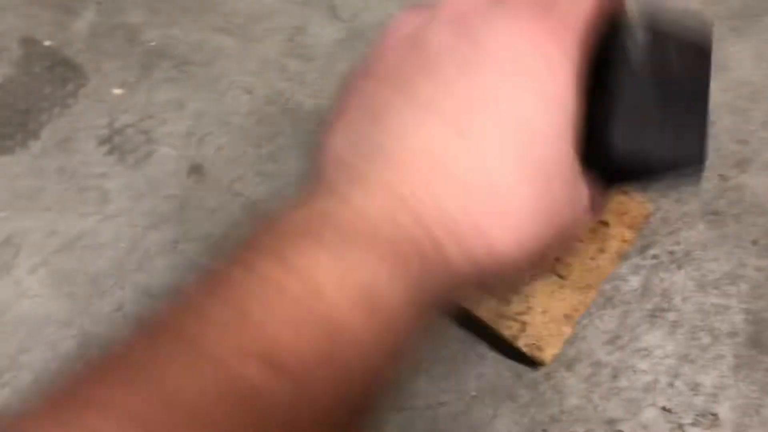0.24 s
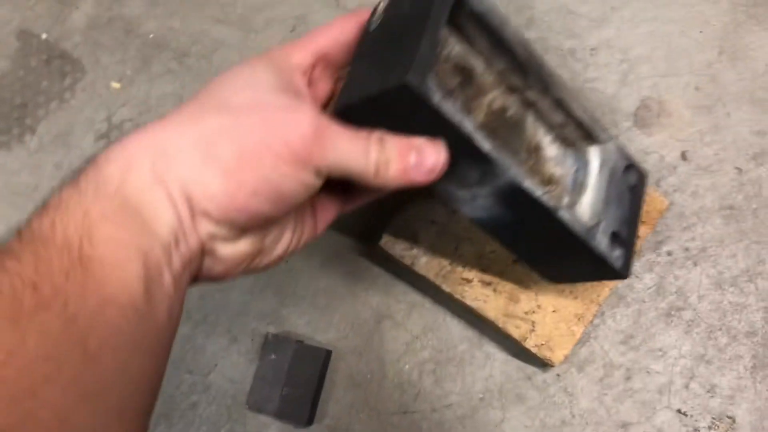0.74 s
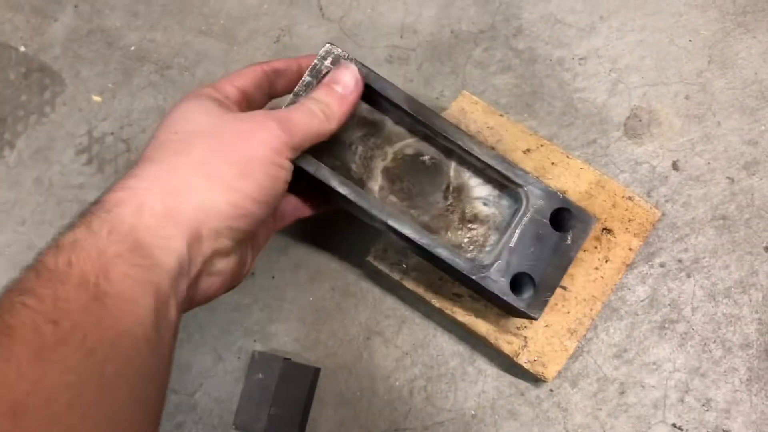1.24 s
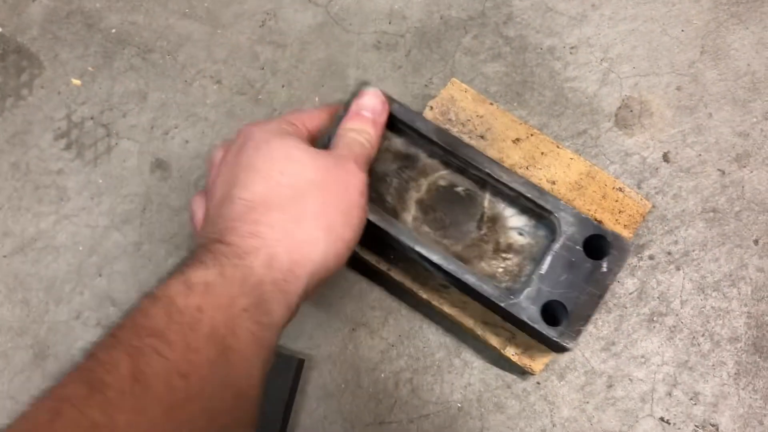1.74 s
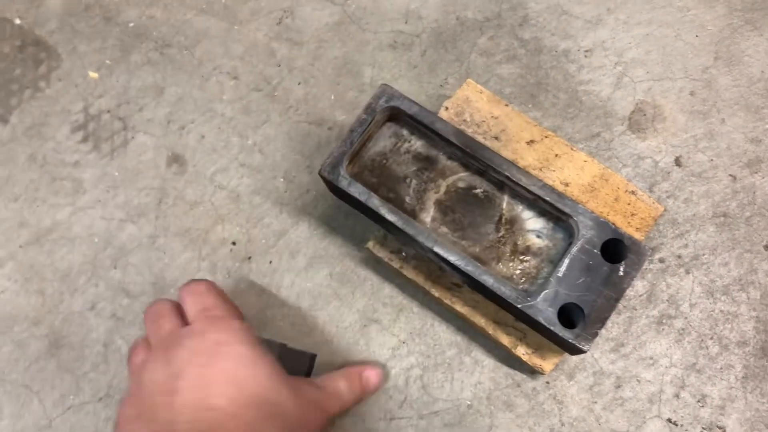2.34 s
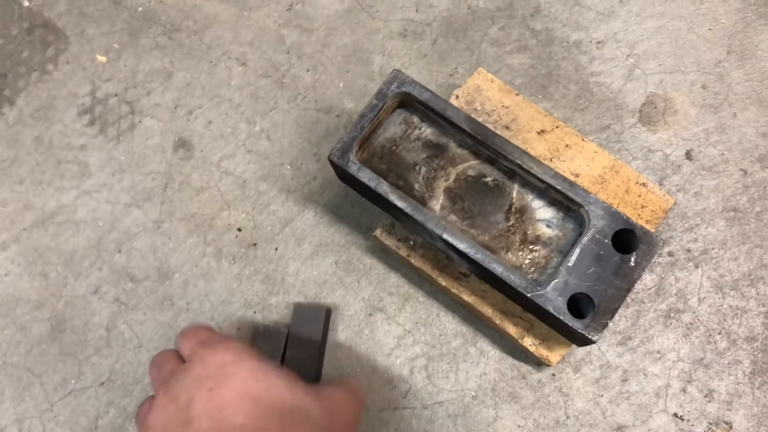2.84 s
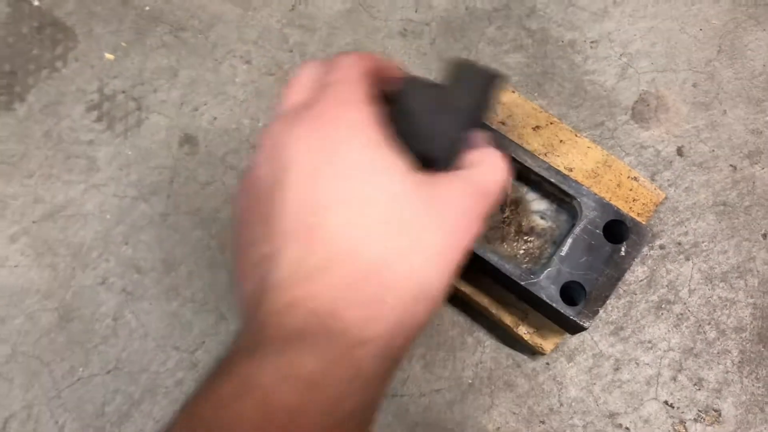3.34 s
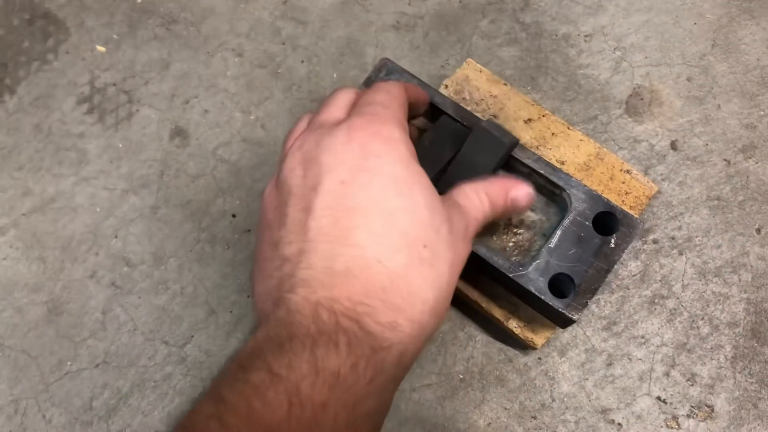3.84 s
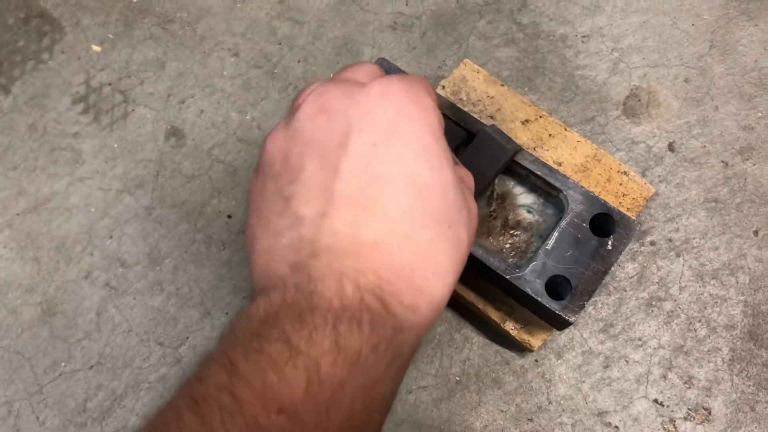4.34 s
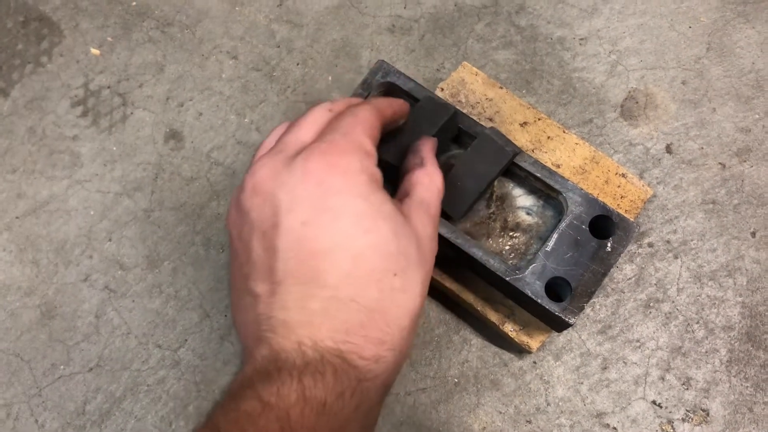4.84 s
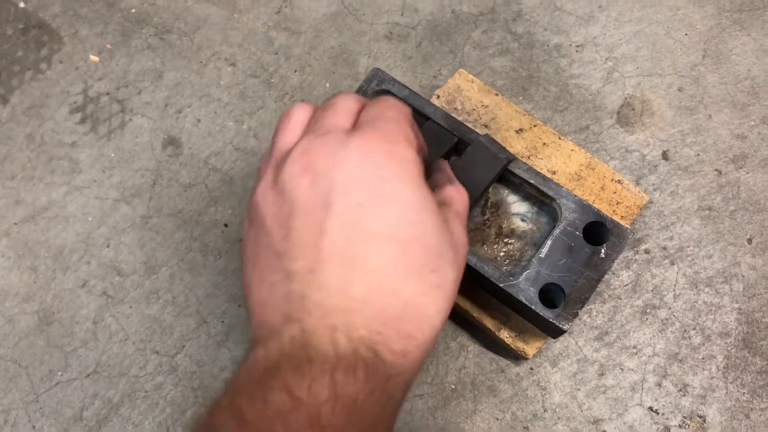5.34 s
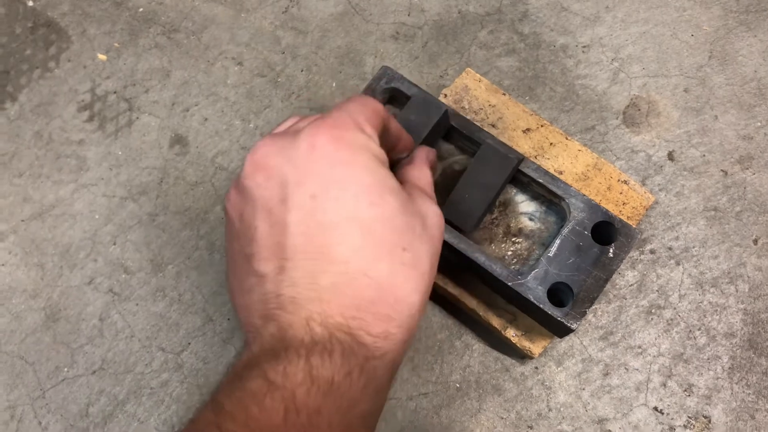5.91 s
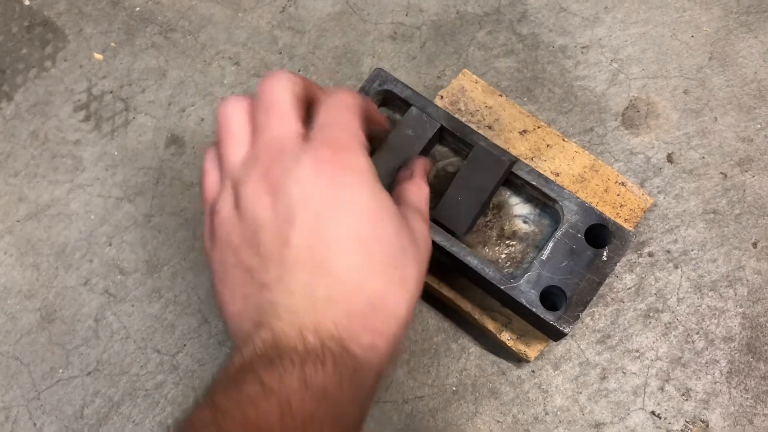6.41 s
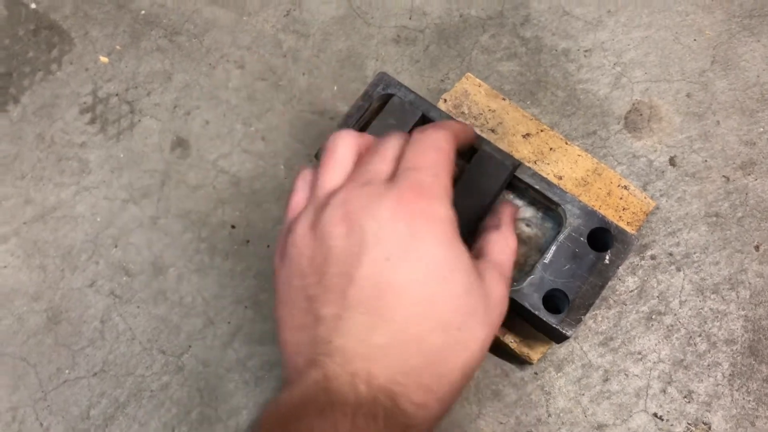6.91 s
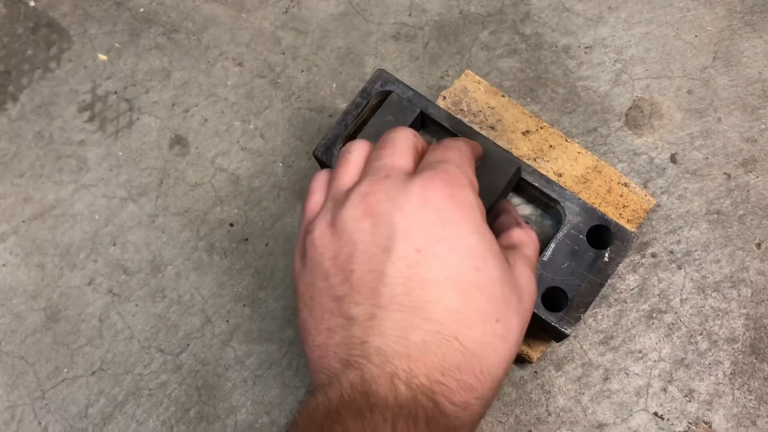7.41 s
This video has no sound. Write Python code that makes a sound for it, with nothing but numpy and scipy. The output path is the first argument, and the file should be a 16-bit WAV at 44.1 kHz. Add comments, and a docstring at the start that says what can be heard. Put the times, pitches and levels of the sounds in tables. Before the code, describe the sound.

A low furnace burner roars steadily with a faint hiss while a graphite mould knocks on a plank and small blocks clink into it.

```python
"""A low, steady roar with a faint hiss, and over it knocks, scrapes and ringing clinks.
A small furnace burner in a workshop makes the roar and its gas jet the hiss: resonance-shaped noise.
Close by, a hand turns a graphite ingot mould over, sets it on a plank, picks two small blocks off
the concrete floor and stands them in the mould, where they clink. Blows are band-limited pushes
with a dying chatter, rings are dying sines, and slips are a wavering tone with a noise scuff."""
import sys
import numpy as np
from scipy import signal
from scipy.fft import rfft, irfft
from scipy.io import wavfile
from scipy.ndimage import uniform_filter1d

SR = 44100
rng = np.random.default_rng(int(sys.argv[2]) if len(sys.argv) > 2 else 0)


def pcm_store(signal):
    """Save signal as 16-bit PCM."""
    levels = np.round(np.clip(np.atleast_2d(signal), -1, 1) * 32767)
    wavfile.write(sys.argv[1], SR, levels.astype(np.int16).T)


N = 338247


def gain_of(db):
    """Decibels to amplitude."""
    return 10 ** (np.asarray(db) / 20)


def read(points, hz):
    """A table's value at hz, joined on a log-frequency axis."""
    f, value = np.transpose(points)
    return np.interp(np.log(hz + 1), np.log(f), value)


def add(mix, start_s, sound):
    """Mixes a sound in at start_s, cut at the end of the mix."""
    part = mix[round(start_s * SR):][:len(sound)]
    part += sound[:len(part)]


def turbulence(slope, peaks):
    """Gas noise of a broad spectrum, lifted or cut at each resonance."""
    hz = np.fft.rfftfreq(N, 1 / SR)
    db = read(slope, hz)
    for peak_hz, width_hz, lift_db in peaks:
        db = db + lift_db * np.exp(-(2 * (hz - peak_hz) / width_hz) ** 2)
    spectrum = rfft(rng.standard_normal(N)) * gain_of(db)
    return irfft(spectrum, N) * np.sqrt(SR / 2)  # dB per Hz to amplitude


def ring(modes, length=1, tilt_db_per_octave=0):
    """Modes as dying sines: length scales every decay, tilt favours those above the first."""
    t = np.arange(SR // 2) / SR
    out = np.zeros(len(t))
    for k, (hz, db, t60_s) in enumerate(modes):
        level_db = db + tilt_db_per_octave * np.log2(hz / modes[0][0])
        decay_db = -60 * t / (t60_s * length)
        out += (-1) ** k * gain_of(level_db + decay_db) * np.sin(2 * np.pi * hz * t)
    return out


def contact(low_hz, top_hz, chatter, t60_s):
    """One sharp push and a dying chatter of the rough faces, with a peak near 1."""
    t = np.arange(SR // 8) / SR
    top_hz = np.clip(top_hz, low_hz + 100, SR / 2 - 100)
    band = signal.butter(3, [low_hz, top_hz], "band", fs=SR, output="sos")
    push = signal.sosfilt(band, signal.unit_impulse(len(t)))
    rattle = signal.sosfilt(band, rng.standard_normal(len(t)) * gain_of(-60 * t / t60_s))
    return (push + chatter * rattle) / abs(push).max()


def burner(roar_rms_db=-15.5, hiss_db=0):
    """Flame turbulence roars through furnace and room; jet turbulence hisses through the burner tube."""
    # flame spectrum before resonances: (frequency [Hz], relative density [dB/Hz])
    roar_slope = [(20, -85), (32, -85), (42, -67.5), (62, -62.5), (100, -49.5), (150, -49), (200, -43.5),
                  (270, -48), (340, -48.5), (390, -65.5), (470, -67.5), (600, -70.5), (800, -84.5),
                  (1300, -110)]
    # furnace and room resonances: (frequency [Hz], width [Hz], lift [dB])
    roar_peaks = [(64.5, 16, 5.5), (88.3, 5.9, -13), (121.5, 8.7, 7), (149.85, 18.8, 14.5),
                  (177.5, 35.1, 8), (196.1, 9.8, 10.5), (226.5, 23, 10.5), (241.1, 11.2, 9.5),
                  (271.1, 39, 12), (308.3, 28.6, 7), (350.3, 23, 8), (379.3, 11.6, 10), (405.3, 5, 10),
                  (419.9, 36.5, 15.5), (470.5, 26, 12), (505, 31, 5.5), (539, 17.5, 8.5), (688, 55, 8)]
    # jet spectrum before resonances: (frequency [Hz], density [dB/Hz])
    hiss_slope = [(400, -110), (800, -78), (1300, -86.5), (2200, -93), (3200, -93), (3900, -100.4),
                  (5300, -99.4), (8000, -99.8), (10500, -94.5), (13000, -96), (14300, -99), (15700, -92)]
    # burner tube resonances: (frequency [Hz], width [Hz], lift [dB])
    hiss_peaks = [(877, 23, -21), (1160, 110, 6), (1749, 106, 12), (2453, 142, 12.5), (2940, 110, 6.5),
                  (3510, 143, 17), (4166, 190, 12.5), (4370, 103, 6.5), (4757, 275, 10), (4940, 54, 13),
                  (5065, 280, 10), (5633, 86, 15), (5875, 160, 12.5), (6230, 380, 12.5), (7140, 240, 8),
                  (7620, 360, 8), (8150, 212, 7.2), (9030, 340, 6.5), (9712, 184, 2.5), (11740, 162, 5),
                  (12330, 320, 10), (13700, 631, 6), (15320, 140, 2.9)]
    roar = turbulence(roar_slope, roar_peaks)
    hiss = turbulence(hiss_slope, hiss_peaks)
    return gain_of(roar_rms_db) * roar / roar.std() + gain_of(hiss_db) * hiss


def workshop(x, wet_db=-19, echo_db=-15, echo_s=0.0045):
    """A quick bounce off the floor, then a diffuse tail whose decay time depends on frequency."""
    # reverberation: (frequency [Hz], t60 [s])
    room_t60 = [(500, 0.33), (2500, 0.54), (6000, 0.28), (14000, 0.023)]
    hz, t, z = signal.stft(rng.standard_normal(SR // 2), SR, nperseg=256)
    decay_db = -60 * t / read(room_t60, hz)[:, None]
    tail = signal.istft(z * gain_of(decay_db), SR, nperseg=256)[1]
    tail = tail / np.linalg.norm(tail)
    out = x.copy()
    add(out, echo_s, gain_of(echo_db) * x)
    add(out, 2 * echo_s, gain_of(wet_db) * signal.fftconvolve(x, tail))
    return out


def grit():
    """Grains under hand and blocks crack with a dry, bright tick, or scrape on briefly."""
    # ticks and scuffs: (time [s], level [dB], top [Hz], chatter t60 [s])
    ticks = [(1.334, -37, 15100, 0.12), (1.378, -37, 13960, 0.12), (2.663, -29.5, 6460, 0.013),
             (2.936, -48, 8000, .03), (2.9684, -16, 11400, 0.012)]
    out = np.zeros(N)
    for start_s, db, top_hz, t60_s in ticks:
        add(out, start_s, gain_of(db) * contact(low_hz=2520, top_hz=top_hz, chatter=0.24, t60_s=t60_s))
    return out


def drag(bend_hz=2335, waver_rms_hz=25, scuff_db=-9, attack_s=.005, t60_s=.09):
    """Friction as the mould is lifted keeps its bending mode singing, with wavering pitch and dry scuff."""
    # slips: (time [s], rms level of the song [dB], hold from onset [s])
    slips = [(0.089, -44, 0.029), (0.132, -44, 0.033)]
    t = np.arange(SR // 4) / SR
    scuff_band = signal.butter(2, [1200, 4000], "band", fs=SR, output="sos")
    out = np.zeros(N)
    for start_s, db, hold_s in slips:
        waver = uniform_filter1d(rng.standard_normal(len(t)), size=200)
        pitch_hz = bend_hz + waver_rms_hz * waver / waver.std()
        song = np.sqrt(2) * np.sin(2 * np.pi * np.cumsum(pitch_hz) / SR)
        scuff = signal.sosfilt(scuff_band, rng.standard_normal(len(t)))
        attack = np.minimum(t / attack_s, 1)
        decay_db = -60 * np.maximum(t - hold_s, 0) / t60_s
        envelope = attack * gain_of(db + decay_db)
        add(out, start_s, envelope * (song + gain_of(scuff_db) * scuff / scuff.std()))
    return out


def knocks():
    """Dull knocks of the mould on the plank: the wood damps the mould almost at once."""
    # knocks: (time [s], contact level [dB], contact top [Hz], ring level [dB])
    blows = [(.023, -33, 1200, -60), (.027, -28.5, 1190, -60), (0.7862, -27.5, 2580, -45),
             (1.7025, -28.5, 1390, -50), (1.7314, -17.5, 1930, -28.5)]
    # mould and plank pressed together: (frequency [Hz], level re ring [dB], t60 [s])
    plank_modes = [(573, 7.5, 0.082), (715, 13.5, 0.011), (960, -16, 0.049), (3120, 0, 0.042)]
    out = np.zeros(N)
    for start_s, db, top_hz, ring_db in blows:
        add(out, start_s, gain_of(db) * contact(low_hz=515, top_hz=top_hz, chatter=0.054, t60_s=0.1))
        add(out, start_s, gain_of(ring_db) * ring(plank_modes))
    return out


def clinks(crack_db=-14.0, crack_top_hz=11500, soft_top_hz=4500, doubling_db_per_octave=8.2):
    """Each blow rings mould and blocks; a harder one is brighter, and the load shifts and damps the ring."""
    # blows: (time [s], contact level [dB], ring level [dB], hardness as treble tilt [dB/octave], spot)
    blows = [ (1.054, -17, -23, -8, "base"), (1.0986, -19, -26.5, -7, "base"), (1.509, -52, -45, 2, "base"),
             (3.4232, -27.5, -39.5, -9.5, "first block"), (3.4622, -15.5, -22, -0.5, "long wall"),
             (3.768, -34, -37.5, -6, "both blocks"), (3.783, -17, -25.5, 5, "both blocks"),
             (3.7887, -29, -14, -7.5, "both blocks"), (4.0693, -39, -41, -7.5, "rim"),
             (4.1755, -39, -49, -1, "both blocks"), (4.5576, -39.5, -48, -8.5, "long wall"),
             (5.2011, -20, -28, 0, "rim"), (6.189, -14, -20, 8.5, "end wall"),
             (6.4723, -39, -50, -5, "end wall"), (7.3283, -46, -54, -5, "first block")]
    # modes: (frequency [Hz], level re part [dB], t60 before the load's length factor [s])
    walls = [(4230, 0, .1), (4235, -12, .33), (4400, -3, .025), (6169, -20, .18), (7477, -14, .07),
             (8075, -15, .11), (9400, -18, .06), (9755, -15, .08)]
    ends = [(4110, 0, .13), (5085, -8, .24), (5050, -12, .32), (5170, -3, .04), (6503, -1, .08),
            (8013, -3, .09), (9970, -6, .07)]
    rim = [(4915, 0, .12), (5555, -4, .12), (8242, 4, .055), (8850, -4, .1)]
    first_block = [(3346, 0, .11), (6796, -8, .1), (8850, -19, .08), (12760, -16, .07)]
    second_block = [(3632, 0, .12), (6818, -6, .055), (7757, -21, .1), (9982, -21, .08), (10600, -23, .06),
                    (11800, -30, .08)]
    # level of each part by spot struck, re the bending mode:
    # (long walls [dB], end walls [dB], rim [dB], first block [dB], second block [dB])
    spots = { "base": (-19.5, -22, -38, -24, -17), "long wall": (3, -12.5, -31, -11, -30),
             "end wall": (-15, -7, -26, -25, -6), "rim": (-11, -23, -8.5, -31, -1.5),
             "first block": (-9.5, -9, -14, 3, -20), "both blocks": (-12, -18, -28, -5.5, -0.5)}
    # blocks standing in the mould raise and damp its bending mode:
    # (from time [s], bending frequency [Hz], bending t60 [s], ring length factor of other parts)
    loads = [(0, 2327, 0.21, .95), (3.3, 2360, 0.15, 0.99), (4, 2396, 0.069, 0.77)]
    # plank's thud under each clink: (frequency [Hz], level re contact [dB], t60 [s])
    thud_modes = [(608, -12, 0.045), (771, -18, 0.078), (903, -15, 0.023), (1304, -6.5, 0.014),
                  (1720, -5.5, 0.012)]
    out = np.zeros(N)
    for start_s, db, ring_db, hardness, spot in blows:
        _, bend_hz, bend_t60_s, length = [load for load in loads if load[0] <= start_s][-1]
        top_hz = soft_top_hz * 2 ** (hardness / doubling_db_per_octave)
        push = contact(low_hz=1310, top_hz=top_hz, chatter=0.22, t60_s=0.025)
        add(out, start_s, gain_of(db) * push)
        # bright crack, louder from a hard corner
        crack = contact(low_hz=5000, top_hz=crack_top_hz, chatter=0.25, t60_s=0.05)
        add(out, start_s, gain_of(db + crack_db + hardness) * crack)
        add(out, start_s, gain_of(db) * ring(thud_modes))
        add(out, start_s, -ring([(bend_hz, ring_db, bend_t60_s)]))
        for modes, part_db in zip((walls, ends, rim, first_block, second_block), spots[spot]):
            add(out, start_s, gain_of(ring_db + part_db) * ring(modes, length, hardness))
    return out


def scene():
    """The handling sounds in the room, over the burner."""
    background = burner()
    handling = drag() + clinks() + knocks() + grit()
    return (background + workshop(handling))[None]


def record(dry, edge_hz=15850):
    """The recorder's band limit: a steep linear-phase low-pass."""
    lowpass = signal.firwin(511, edge_hz, window=("kaiser", 9), fs=SR)
    return signal.oaconvolve(dry, lowpass[None], "same")


dry = scene()
out = record(dry)
pcm_store(out)
```